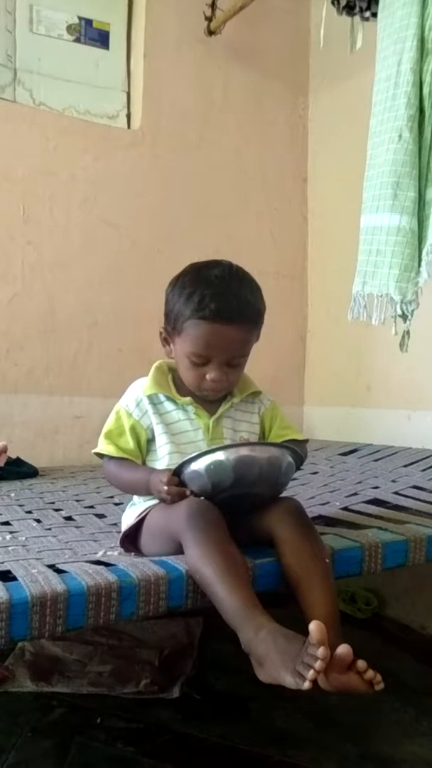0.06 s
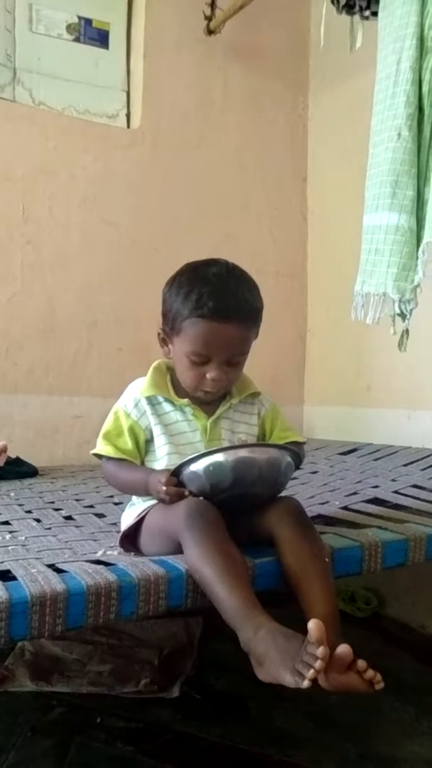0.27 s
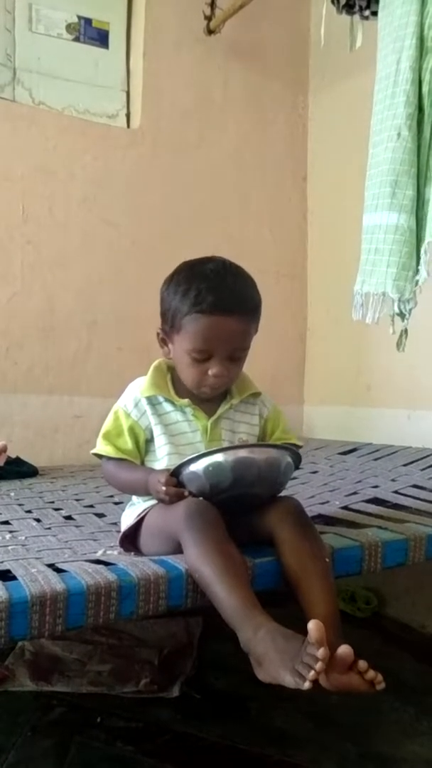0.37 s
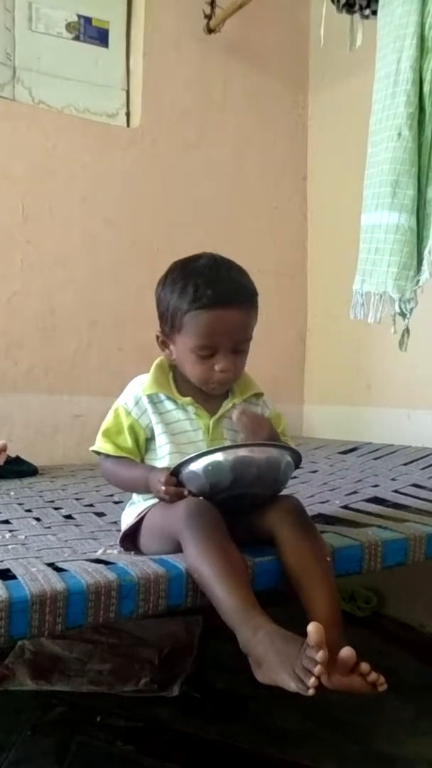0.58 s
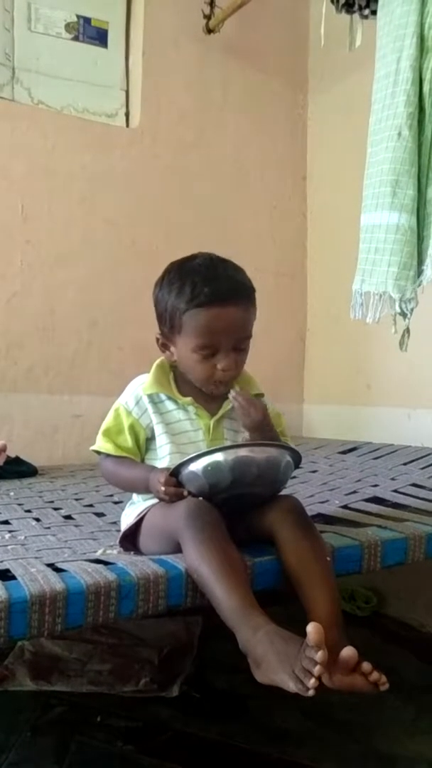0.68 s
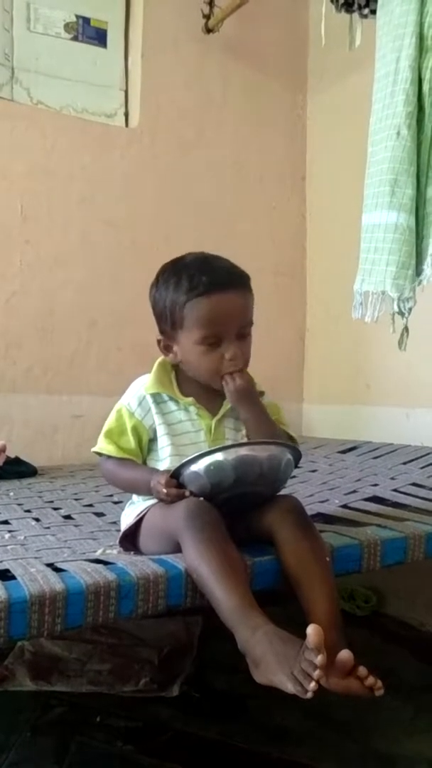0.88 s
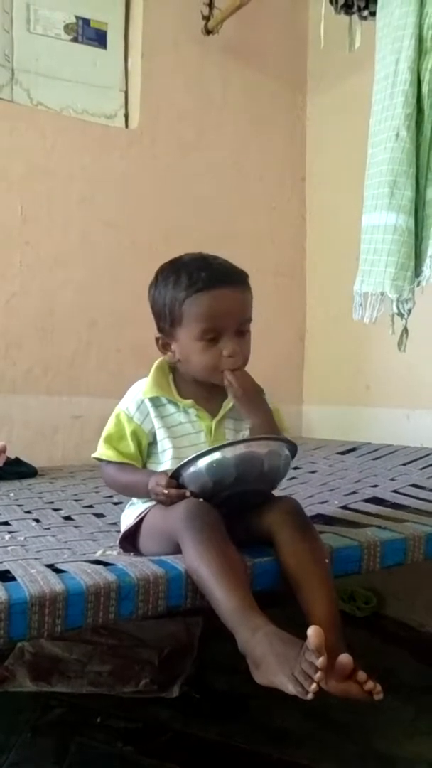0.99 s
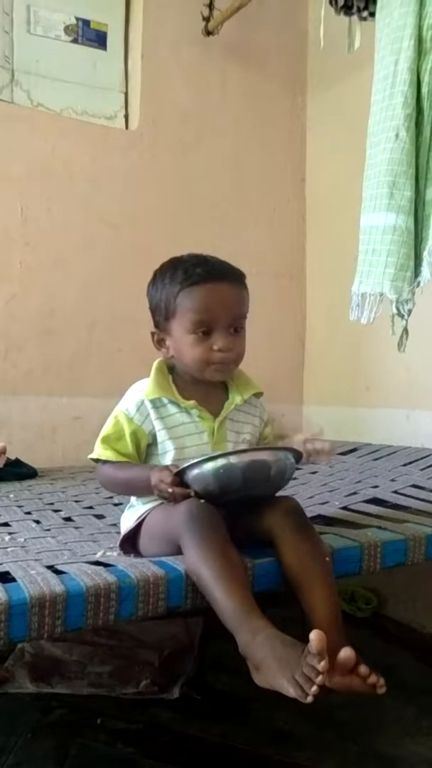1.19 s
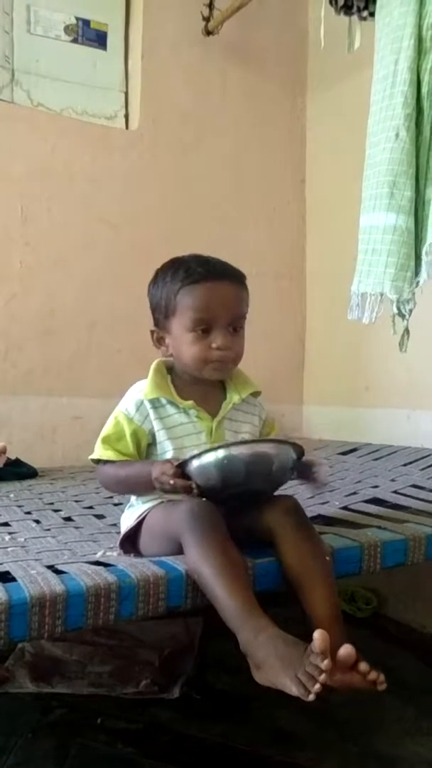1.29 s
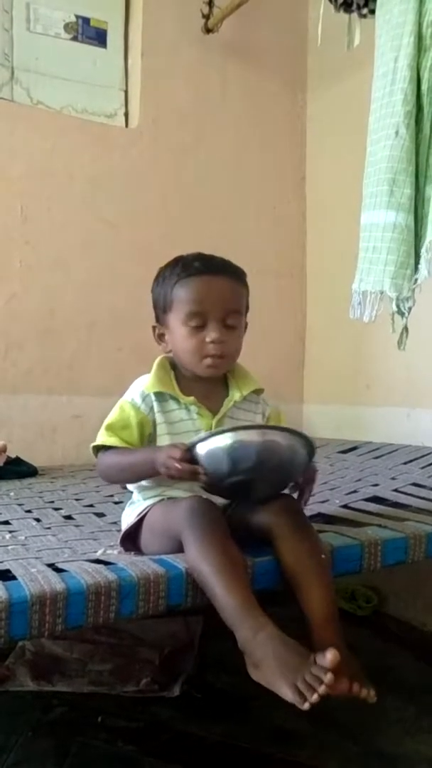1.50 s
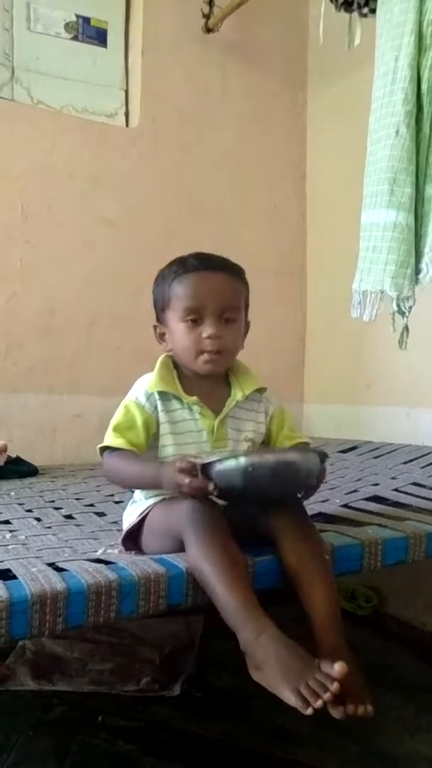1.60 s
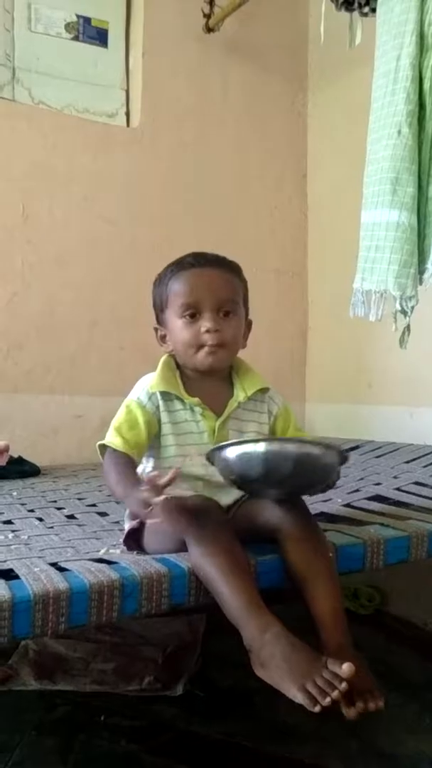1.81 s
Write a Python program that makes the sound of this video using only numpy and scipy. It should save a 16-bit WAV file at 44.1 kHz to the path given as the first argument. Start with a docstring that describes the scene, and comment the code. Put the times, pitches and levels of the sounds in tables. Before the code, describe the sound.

Five hollow metallic knocks on a thin metal bowl, each ringing briefly off hard indoor walls

```python
"""In a small plastered room, a small child slaps a steel bowl on its lap five times.
Each blow is a hollow knock and a short clang of damped sines, a crowd of weak overtones,
and a wash of band-filtered noise that the walls prolong. Filtered noise makes the fingers tick and slide,
short sines rattle the rim and bump the bowl on the knees near the end, over steady dull room noise."""
import sys
import numpy as np
from scipy import signal
from scipy.io import wavfile

SR = 44100
rng = np.random.default_rng(int(sys.argv[2]) if len(sys.argv) > 2 else 0)


def dump_mix(stems):
    """Bounce the given channels to the path in sys.argv[1] as a 16-bit WAV at rate SR."""
    frames = np.atleast_2d(stems).T  # one column per channel
    limited = np.clip(frames, -1, 1)  # hard clip at full scale
    pcm = np.round(limited * 32767).astype(np.int16)
    wavfile.write(sys.argv[1], SR, pcm)


N = 81585
TIME = np.arange(N) / SR   # seconds
BAND_HZ = 1000 * 2 ** (np.arange(-16, 13) / 3)   # third-octave centres

# The five slaps, each with its own force, tone balance and damping by the grip.
# Each row: start in seconds, overall level in dB, then trims in dB for thud, low clang, rim tone, overtones,
# bright ring, clatter and top sizzle, then length factors [ratio] for the low clang and the overtones.
BLOWS = [(0.2105, -3, -3, -3.5, 3.5, 3.5, 4, 5.5, -1, 2.09, 1.26),
         (0.6209, -3, 0.5, -3, -0.5, -0.5, 2.5, 1.5, 3, 1.5, 0.85),
         (0.9391, -2, 0, -1.5, 3, 0, -4.5, -1.5, -2, 0.94, 1.01),
         (1.1804, -8.5, 10, 0, -0.5, 1, 2.5, 1, 5, 1.04, 0.94),
         (1.5588, -2, 2.5, -0.5, 2, -0.5, -1.5, -1.5, -1, 0.86, 1.09)]
# Pitches of the bowl's modes. Each entry: frequency in Hz.
MODE_HZ = [736, 744, 1005, 1109, 1311, 1460, 1631, 1714, 1742, 1885, 2061, 2188, 2948, 3661, 3867, 3927,
           4056, 4369]


def clang():
    """Each blow knocks the bowl and sets its modes ringing; the grip shortens or frees the ring."""
    # The bowl's modes, in the order of MODE_HZ.
    # Each row: level in dB before the blow's trims, t60 in seconds before its length factor,
    # swell time constant in seconds.
    modes = [(0.5, 0.12, 0.0069), (-24.5, .27, 0.051), (-19, 0.1, 0.00076), (-26, 0.55, 0.003),
             (-37.5, 0.27, 0.0024), (-38, .22, 0.006), (-23.5, 0.19, 0.00067), (-17.5, 0.078, 0.0019),
             (-24, 0.21, 0.0015), (-60, 0.065, 0.0029), (-31.5, 0.14, 0.0016), (-24.5, 0.14, 0.0011),
             (-35, 0.24, 0.001), (-21.5, 0.13, .006), (-37, 0.062, 0.011), (-22.5, 0.15, 0.0056),
             (-24, 0.15, 0.023), (-33, 0.13, 0.0068)]
    low_clang_below_hz, rim_below_hz = 880, 1200
    # dead resonances of the contact: Hz, dB before the blow's level, t60 in seconds
    thud, knock = (356, -11.5, 0.014), (936, -3, 0.016)
    out = np.zeros(N)
    for blow in BLOWS:
        s, db, thud_db, low_db, rim_db, *_, low_length, length = blow
        contact = from_db(thud_db) * ring(s, *thud) + ring(s, *knock)
        out += from_db(db) * contact
        for k, (hz, (mode_db, t60, swell_s)) in enumerate(zip(MODE_HZ, modes)):
            if hz < low_clang_below_hz:
                out += ring(s, hz, db + mode_db + low_db, t60 * low_length, swell_s)
            elif hz < rim_below_hz:
                out += ring(s, hz, db + mode_db + rim_db, t60, swell_s)
            else:
                polarity = (-1) ** k   # upper neighbours start in opposite directions
                out += polarity * ring(s, hz, mode_db + colour_db(blow, hz), t60 * length, swell_s)
    return out


def overtones():
    """Many weak modes of the thin steel: the same pitches at every blow, in a new mix each time."""
    # The crowd's colour and damping.
    # Each row: frequency in Hz, level of each tone in dB before mix and blow colour,
    # t60 in seconds before the blow's length factor.
    crowd = [(1290, -49.5, 0.21), (1860, -34.5, 0.14), (2680, -47, 0.26), (3020, -36.5, 0.17),
             (3320, -45, 0.16), (4030, -35, 0.2), (4660, -51, 0.12), (5300, -49.5, 0.16), (6200, -65, 0.11),
             (7400, -44.5, 0.11), (8000, -55, 0.14), (9400, -60.5, 0.21), (11000, -59, 0.16),
             (12300, -72, 0.1), (15500, -72, .09)]
    count, swell_s = 280, 0.0005   # swell is a time constant
    # one pitch at random in each slot, so the crowd is spread without a pattern
    places = (np.arange(count) + rng.random(count)) / count
    hz = np.interp(places, [0, 0.5, 1], [1200, 5000, 15500])
    mixes = np.clip(rng.standard_normal((len(BLOWS), count)), -2, 2)
    age = TIME[:SR // 4]
    cycles = np.outer(hz, age) + rng.random((count, 1))
    tones = np.sin(2 * np.pi * cycles) * (1 - np.exp(-age / swell_s))
    loss = np.log(1000) * np.outer(1 / at_hz(crowd, hz, axis=2), age)
    out = np.zeros(N + len(age))
    for blow, mix in zip(BLOWS, mixes):
        first = int(blow[0] * SR)
        gains = mix * from_db(at_hz(crowd, hz) + colour_db(blow, hz))
        out[first:first + len(age)] += gains @ (tones * np.exp(-loss / blow[-1]))
    return out[:N]


def wash():
    """The slap of the palm: a quick splash, then a diffuse tail that dies band by band."""
    # Diffuse tail in the room.
    # Each row: frequency in Hz, level in dB per third octave before blow colour, t60 in seconds.
    tail_bands = [(57, -46, 0.86), (138, -48.5, 0.77), (272, -31.5, .5), (424, -37.5, 0.4),
                  (530, -44.5, 0.58), (790, -20.5, 0.25), (970, -45.5, 0.25), (1290, -41.5, 0.6),
                  (1990, -27.5, 0.21), (3150, -38, 0.3), (4070, -42, 0.21), (4960, -71, 0.66),
                  (6300, -48.5, 0.25), (9800, -73.5, 0.54), (14900, -57, .15)]
    # First splash of the blow. Each row: frequency in Hz, level in dB per third octave before blow colour.
    splash_bands = [(100, -43), (390, -25), (550, -28), (1000, -16.5), (2500, -21), (4200, -28),
                    (6000, -43.5), (10500, -36), (13000, -47), (16000, -54)]
    tail_rise_s, splash_rise_s, splash_t60_s = 0.009, 0.00037, 0.042   # rises are time constants
    out = np.zeros(N)
    for hz, band in zip(BAND_HZ, noise_bands()):
        tail_gain, splash_gain = from_db(at_hz(tail_bands, hz)), from_db(at_hz(splash_bands, hz))
        tail_t60_s = at_hz(tail_bands, hz, axis=2)
        for blow in BLOWS:
            first = int(blow[0] * SR)
            age = TIME[:N - first]
            tail = tail_gain * np.exp(-np.log(1000) * age / tail_t60_s)
            tail = tail * (1 - np.exp(-age / tail_rise_s))
            splash = splash_gain * np.exp(-np.log(1000) * age / splash_t60_s)
            splash = splash * (1 - np.exp(-age / splash_rise_s))
            envelope = np.hypot(tail, splash)   # the two add in power
            out[first:] += from_db(colour_db(blow, hz)) * envelope * band[first:]
    return out


def colour_db(blow, hz):
    """How strongly one blow drives each register of the bowl, in dB."""
    _, db, thud_db, _, _, over_db, bright_db, clatter_db, top_db, *_ = blow
    registers_hz = [300, 700, 1300, 3200, 3600, 4400, 5000, 6300, 8500]
    trims_db = [thud_db / 2, 0, over_db, over_db, bright_db, bright_db, clatter_db, clatter_db, top_db]
    return db + np.interp(hz, registers_hz, trims_db)


def rattles():
    """The rim rattles against the fingers: a light second touch wakes the bright modes again."""
    # Light touches. Each row: start in seconds, level in dB shared among the bright modes.
    touches = [(0.95, -23.5), (1.031, -38.5), (1.192, -21.5), (1.575, -19), (1.655, -48)]
    above_hz, below_hz = 3900, 4200
    t60_s, swell_s = 0.082, 0.0037   # swell is a time constant
    bright = [hz for hz in MODE_HZ if above_hz < hz < below_hz]
    mixes = rng.standard_normal((len(touches), len(bright)))
    mixes = mixes / np.linalg.norm(mixes, axis=1, keepdims=True)
    out = np.zeros(N)
    for (s, db), mix in zip(touches, mixes):
        for hz, share in zip(bright, mix):
            out += share * ring(s, hz, db, t60_s, swell_s)
    return out


def fingers():
    """Fingertips tick as resonant noise that dies away; one brief slide off the rim is coloured noise."""
    # Light ticks on the steel. Each row: start in seconds, level in dB.
    taps = [(1.048, -62), (1.064, -67), (1.285, -59.5), (1.57, -36.5)]
    # Colour of the slide. Each row: frequency in Hz, level in dB per third octave.
    slide_bands = [(1500, -60), (3500, -63), (5500, -62), (8000, -66.5), (10000, -67.5), (15000, -107)]
    tick_hz, tick_width_hz, tick_t60_s = 9200, 2600, 0.058
    slide_s, slide_rise_s, slide_hold_s, slide_t60_s = 1.304, 0.008, 0.039, 0.23   # hold includes the rise

    # a resonator run twice; its zeros thin the bass and the extreme top
    radius = np.exp(-np.pi * tick_width_hz / SR)
    b = [1, 0.009, -1.1]
    a = [1, -2 * radius * np.cos(2 * np.pi * tick_hz / SR), radius * radius]
    hiss = signal.lfilter(b, a, signal.lfilter(b, a, rng.standard_normal(N)))
    tapping = hiss / hiss.std() * sum(from_db(db) * dying(s, tick_t60_s) for s, db in taps)

    release_s = slide_s + slide_hold_s
    rise = np.clip((TIME - slide_s) / slide_rise_s, 0, 1)
    stroke = rise * np.where(TIME < release_s, 1, dying(release_s, slide_t60_s))
    rub = from_db(at_hz(slide_bands, BAND_HZ)) @ noise_bands()
    return tapping + stroke * rub


def bumps():
    """The bowl settles on the knees: each soft thump is three short damped sines."""
    # Thumps on the knees. Each row: start in seconds, level in dB before the mode levels.
    thumps = [(1.742, -37), (1.8, -41.5), (1.8077, -28), (1.828, -38)]
    # Modes of a thump. Each row: frequency in Hz, level in dB relative to the thump, t60 in seconds.
    thump_modes = [(99.5, 8, 0.032), (348, -19, 0.056), (691, -13.5, 0.11)]
    return sum(ring(s, hz, db + mode_db, t60) for s, db in thumps for hz, mode_db, t60 in thump_modes)


def walls(x):
    """A few slightly dulled reflections from the walls join the direct sound."""
    # Reflections. Each row: delay in seconds, level in dB.
    echoes = [(.0113, -17), (.078, -22.5), (.11, -28)]
    dull_hz = 2950
    lowpass = signal.butter(1, dull_hz, fs=SR, output="sos")
    dull = signal.sosfilt(lowpass, x + 1e-18)   # an inaudible offset
    return x + sum(from_db(db) * np.interp(TIME - delay, TIME, dull, left=0) for delay, db in echoes)


def room_air():
    """Steady, dull background: third-octave noises at fixed levels."""
    # Colour of the background. Each row: frequency in Hz, level in dB per third octave.
    air = [(25, -78), (45, -81), (66, -57.5), (85, -60.5), (125, -65), (190, -56.5), (300, -53.5),
           (500, -61.5), (720, -55.5), (1100, -56), (1400, -66), (2100, -64), (2600, -70), (3800, -72.5),
           (5500, -87), (10000, -85), (16000, -89)]
    return from_db(at_hz(air, BAND_HZ)) @ noise_bands()


def ring(s, hz, db, t60, swell_s=0):
    """One mode struck at s, a sine that dies exponentially; it may take a moment to swell."""
    out, first = np.zeros(N), int(s * SR)
    age = TIME[:min(N - first, int(2 * t60 * SR))]
    swell = 1 - np.exp(-age / max(swell_s, 1 / SR))
    decay = np.exp(-np.log(1000) * age / t60)
    out[first:first + len(age)] = swell * decay * np.sin(2 * np.pi * hz * age)
    return from_db(db) * out


def dying(s, t60):
    """An envelope that starts at s and falls 60 dB in each t60."""
    age = TIME - s
    loss = np.log(1000) * np.maximum(age, 0) / t60
    return (age >= 0) * np.exp(-np.minimum(loss, 20))


def noise_bands():
    """Unrelated third-octave noises, each of rms 1."""
    half = 2 ** (1 / 6)   # band centre to edge, as a ratio
    bands = []
    for hz in BAND_HZ:
        narrow = signal.butter(2, [hz / half, hz * half], "band", fs=SR, output="sos")
        wide = signal.butter(2, [hz / half ** 2, hz * half ** 2], "band", fs=SR, output="sos")
        noise = rng.standard_normal(N + SR // 2)   # the extra half second lets the filters settle
        band = signal.sosfilt(wide, signal.sosfilt(narrow, noise))
        bands.append(band[-N:])
    bands = np.array(bands)
    return bands / bands.std(axis=1, keepdims=True)


def at_hz(table, hz, axis=1):
    """Read a column of a table on a log-frequency axis."""
    table = np.array(table)
    return np.interp(np.log(hz), np.log(table[:, 0]), table[:, axis])


def from_db(db):
    """Decibels to gain."""
    return 10 ** (np.asarray(db) / 20)


def scene():
    """Bowl, hands and room in one channel; the wall echoes follow the clang and overtones."""
    bowl = walls(clang() + overtones())
    return (bowl + wash() + rattles() + fingers() + bumps() + room_air())[None]


def record(dry):
    """The deep bass is lost, the loudest peaks are rounded and the top is cut."""
    low_cut_hz, peak, cutoff_hz = 67, 0.76, 15800   # peak: ceiling of the rounding, full scale 1
    bass_cut = signal.butter(3, low_cut_hz, "high", fs=SR, output="sos")
    thin = signal.sosfilt(bass_cut, dry)
    rounded = thin / (1 + (thin / peak) ** 6) ** (1 / 6)
    top_cut = signal.ellip(10, 0.2, 80, cutoff_hz, fs=SR, output="sos")
    return signal.sosfilt(top_cut, rounded)


dry = scene()
out = record(dry)
dump_mix(out)
```